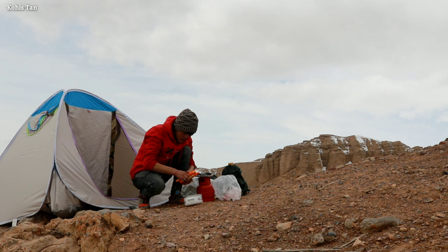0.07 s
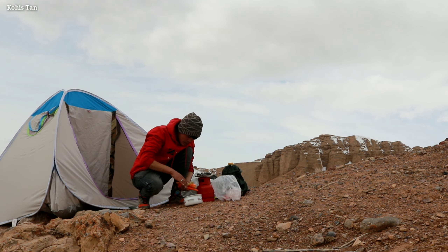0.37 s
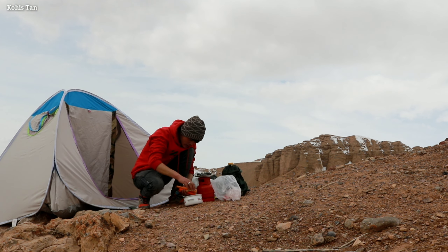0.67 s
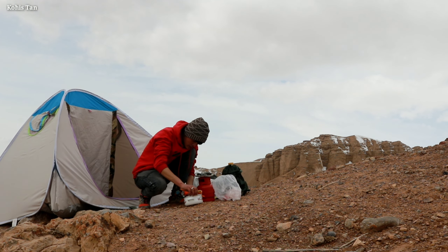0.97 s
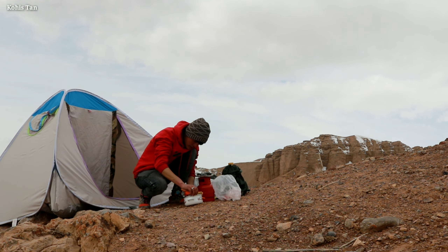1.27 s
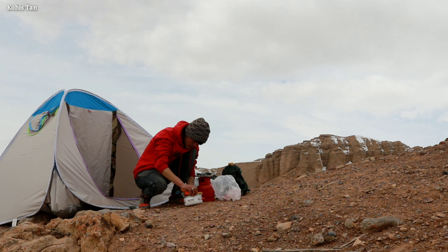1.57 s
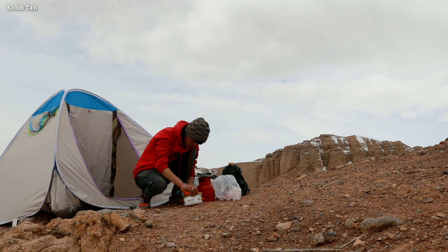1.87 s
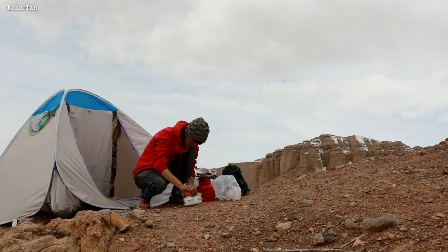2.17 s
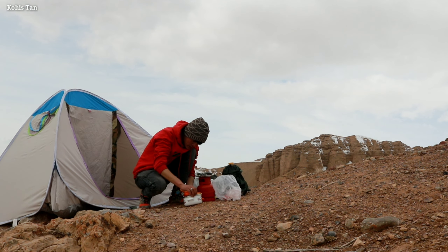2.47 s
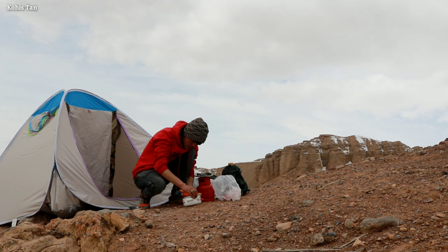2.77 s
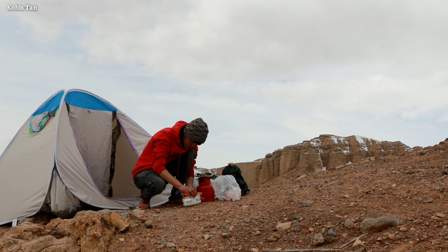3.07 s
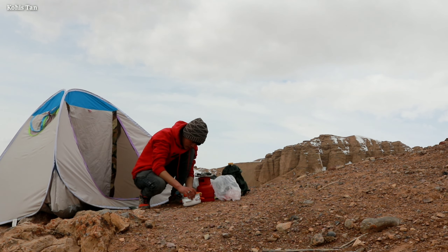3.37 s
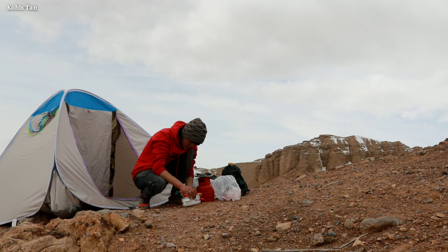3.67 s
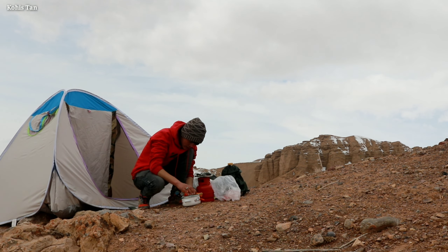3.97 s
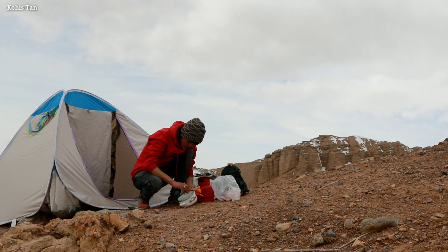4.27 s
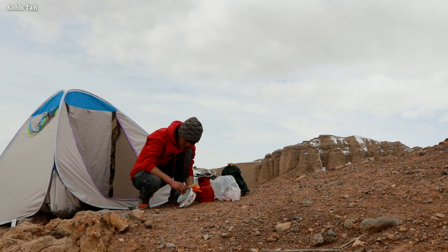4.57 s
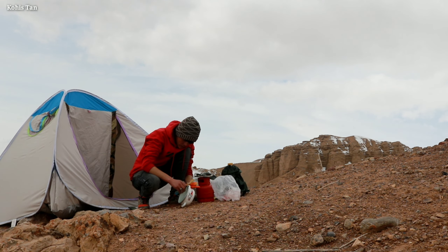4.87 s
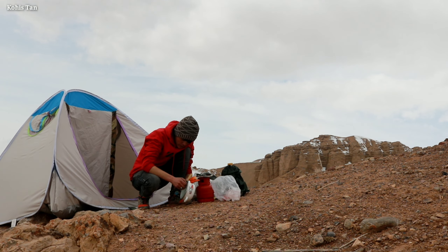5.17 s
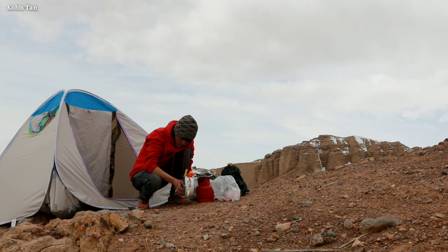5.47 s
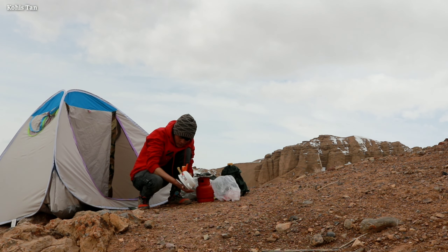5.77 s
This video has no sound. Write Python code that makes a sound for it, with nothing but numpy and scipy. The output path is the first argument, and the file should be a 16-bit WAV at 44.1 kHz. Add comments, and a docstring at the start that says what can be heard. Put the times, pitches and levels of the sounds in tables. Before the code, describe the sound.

Someone handles a metal camp pot a few metres ahead in open desert with no echo. It gives scattered, hand-muffled knocks and taps, then sharper clanks as the wire handle rattles and faintly rubs. Near the end the lid comes off with a quick clatter and a hollow ring. Low wind buffets the microphone throughout, mostly on the right, over a faint steady hiss.

```python
"""A camp pot in the wind

Someone by a tent handles a metal pot a few metres away, in open desert with no echo. Muffled by the
hand, the pot knocks and chatters; its wire handle rattles and rubs, and the lid comes off with a
hollow ring. Wind buffets the microphone, mostly on the right, over a faint steady hiss."""
import sys
import numpy as np
from scipy import signal
from scipy.fft import rfft, irfft, next_fast_len
from scipy.io import wavfile
from scipy.ndimage import uniform_filter1d

SR = 44100
rng = np.random.default_rng(int(sys.argv[2]) if len(sys.argv) > 2 else 0)


def to_wav(sig):
    """Store sig (one row per channel, or 1-D mono) as 16-bit WAV at the path in sys.argv[1].

    Samples outside -1..1 are clipped; the rate is SR.
    """
    pcm = np.clip(np.atleast_2d(sig), -1, 1) * 32767
    pcm = np.round(pcm).astype(np.int16)
    wavfile.write(sys.argv[1], SR, pcm.T)  # frames by channels


N = 265658
T = np.arange(N) / SR
AGE = np.arange(SR // 2) / SR  # seconds since a blow


def pot():
    """Each knock is a clack, short notes of the gripped wall, a freer ring and a thud on the ground."""
    # Each row: start in seconds, level in dB, treble change in dB, thud against the knock in dB,
    # three wall notes in Hz, free ring against those notes in dB.
    knocks = [(0.9501, -39, -0.5, -11, 1310, 1550, 2275, 3), (1.007, -59.5, -18, -5, 1571, 990, 2277, -3),
              (1.0497, -47, -6, -6.5, 1314, 1580, 2240, -2), (1.4626, -53.5, -9, -19, 1125, 1450, 2360, -3),
              (1.5821, -47.5, -4.5, -8.5, 1090, 1440, 2390, 1), (1.8103, -52, -9, -21, 1110, 1580, 2740, 1),
              (2.4305, -47.5, -3.5, -14, 1106, 1644, 2310, -4),
              (2.753, -35.5, -2, -14, 1576, 2300, 2667, 0), (2.914, -58.5, -17, -4.5, 1620, 1080, 2880, -9),
              (3.0203, -51, -6, -6, 1870, 1070, 2310, -4), (3.1938, -43.5, -9, -9, 1473, 930, 2230, 2.5),
              (3.5259, -42, -1, -7, 1690, 1150, 2700, -2),
              (3.81, -30.5, -0.5, -10.5, 1764, 1325, 2710, -3.5),
              (3.867, -55.5, -10, 4, 1060, 1720, 1960, -3), (3.971, -54, -13, 7.5, 1480, 1140, 1545, 1),
              (4.301, -49.5, -15, -7.5, 1290, 830, 1600, 1), (5.021, -58, -22, -9, 1080, 1310, 2100, -14),
              (5.5443, -51, -7, 0, 1850, 1060, 2230, -16), (5.5862, -50.5, -10, -8, 1336, 1130, 2670, -16),
              (5.67, -47, -3.5, -12, 1390, 1160, 2280, -12), (5.7101, -53, -2, -6, 1290, 1049, 2710, -9),
              (5.7253, -48.5, -5.5, -12, 1240, 1480, 2680, -5),
              (5.7455, -41.5, 2.5, -17, 1420, 2280, 2645, -18)]
    # The tone of chattering metal. Each row: frequency in Hz, gain in dB.
    clack_tone = [(90, -10), (195, -4.5), (280, -1.5), (480, 1.5), (850, -3.5), (1300, -3), (1620, -10),
                  (1950, -10), (2300, -6), (2650, -3.5), (3250, -12.5), (3950, -12), (4500, -14.5),
                  (8000, -17.5), (15000, -31.5)]
    # How the wall rings. Each row: pitch in Hz, strength in dB, fade time in seconds.
    wall_modes = [(1067, -15, 0.14), (1317, -13, 0.18), (1540, 9.5, 0.051), (1623, 0, 0.063),
                  (1807, -7.5, 0.058), (2136, -5, 0.089), (2303, 8, 0.069), (2757, -2.5, 0.076),
                  (2980, -10, 0.15), (3805, 11, 0.069), (4020, 0, 0.1), (4740, -11, 0.071),
                  (5170, -4, 0.068), (5360, -9, 0.15), (6050, -12, 0.082)]
    # The pot bumping the ground. Each row: pitch in Hz, strength in dB, fade time in seconds.
    thud_modes = [(208, -1.5, 0.058), (274, -5.5, 0.042), (373, -5.5, 0.037)]
    out = np.zeros(N)
    for start, db, treble_db, thud_db, main_hz, second_hz, high_hz, free_db in knocks:
        clack = colour(chatter(hold_s=0.0042, t60=0.056, first=4.5), clack_tone)
        clack_db = -1.5 - 0.28 * (db + 41.5)  # light touches clack, hard blows ring
        notes = [(main_hz, 0, .05), (second_hz, -2, .04), (high_hz, 2, .055),
                 (3850, -4, .04), (4060, -8, .04)]
        gripped = attack_level(ring(notes, rise_s=0.0006), 0)
        free = attack_level(ring(wall_modes, rise_s=0.00056), free_db)
        knock = attack_level(clack, clack_db) + gripped + free
        knock = colour(knock, [(1390, 0), (3750, treble_db)])  # soft contacts are dull
        thud = ring(thud_modes, rise_s=.002)
        add(out, start, attack_level(knock, db) + attack_level(thud, db + thud_db))
    return out


def lid():
    """Scraping jolts of the lid ring the pot's base and the air inside; the air's note climbs."""
    # Each row: start in seconds, air note in dB, pot's base note in dB, drag and fade times in seconds.
    jolts = [(5.67, -50, -45.5, .002, 0.3), (5.712, -39, -47, 0.0044, 0.065),
             (5.728, -52, -35.5, 0.01, 0.13), (5.743, -30.5, -49, 0.0086, .034),
             (5.779, -52, -32, 0.0019, 0.3)]
    # The note of the air in the pot as the gap opens. Each row: time in seconds, pitch in Hz.
    air_pitch = [(5.675, 433.3), (5.71, 469), (5.728, 496), (5.75, 536), (5.78, 572)]
    base_hz, air_roughness, base_roughness = 649, 0.47, 0.066
    air, base = np.zeros((2, N), complex)
    for start, air_db, base_db, drag_s, t60 in jolts:
        grit = (wander(317) + 1j * wander(310))[:len(AGE)]  # shakes both loudness and phase
        swell = fade(t60, drag_s) * rise(0.0013)
        add(air, start, undb(air_db) * swell * (1 + air_roughness * grit))
        add(base, start, undb(base_db) * swell * (1 + base_roughness * grit))
    air_cycles = np.cumsum(np.interp(T, *np.transpose(air_pitch))) / SR
    return np.imag(air * np.exp(2j * np.pi * air_cycles) + base * np.exp(2j * np.pi * base_hz * T))


def handle_clinks():
    """The wire handle skids in its hinges: a gritty scrape, a tick, a short note and a thin ring."""
    # Each row: start in seconds, body strength in dB, note in Hz, tick level in dB.
    clinks = [(2.8833, -51, 1545, -64), (2.8968, -54, 1520, -64), (2.9605, -48, 1850, -60),
              (2.9696, -48, 3250, -57.5), (2.9808, -51, 4150, -61), (2.9943, -49, 1820, -56.5),
              (3.0321, -43, 1870, -59.5), (3.0657, -44, 1887, -61), (4.0709, -56, 1846, -72),
              (4.174, -54, 2320, -67), (4.2098, -72, 2920, -61), (4.2285, -71, 3950, -63),
              (4.3236, -57, 3150, -60), (4.387, -80, 2900, -57), (4.409, -55, 1980, -70),
              (5.7471, -51, 3530, -61), (5.7564, -48, 3600, -69), (5.777, -54, 2300, -60)]
    # How the wire rings. Each row: pitch in Hz, strength in dB, fade time in seconds.
    wire_modes = [(1152, -2, 0.11), (1895, -0.5, 0.14), (2310, -4, 0.057), (2760, 1, 0.11),
                  (3340, 8, 0.031), (3880, 1, 0.045), (4240, -22, 0.041), (4940, 1, 0.06), (6300, -10, .06),
                  (7800, -17, 0.15)]
    scrape_tone = [(200, 20), (900, -6), (1900, 6), (4000, -14), (5300, -5), (7000, -4.5), (15000, -62)]
    out = np.zeros(N)
    for start, body_db, hz, tick_db in clinks:
        skid = chatter(hold_s=0.0011, t60=0.06, first=2) * rise(0.0014)
        scrape = colour(skid, scrape_tone)
        tick = colour(skid, [(2500, -1.5), (6000, -6), (8500, -4), (15000, -18)])
        note = ring([(hz, 0, .05)], rise_s=0.0023)
        wire = ring(wire_modes, rise_s=0.0016)
        body = attack_level(wire, -12) + attack_level(note, -11.5) + attack_level(scrape, -12.5)
        add(out, start, undb(body_db) * body + attack_level(tick, tick_db))
    return out


def loose_ring():
    """When the fingers let go, the wall rings on; whatever still touches it takes treble away."""
    # The grip loosens. Each row: start in seconds, level in dB, change above 2000 Hz in dB.
    releases = [(3.528, -55, -21), (3.817, -47.5, -6), (4.307, -54.5, -12), (5.589, -53, -16),
                (5.680, -56, -1), (5.754, -43.5, 5.5)]
    # The pot hanging loose. Each row: pitch in Hz, strength in dB, fade time in seconds.
    loose_modes = [(1151, 1, 0.22), (1280, -2.5, 0.14), (1505, -2, 0.15), (2250, 3, 0.065),
                   (3500, 3, 0.066), (3832, -0.5, 0.14), (3820, -20, 0.14), (5160, -9, 0.08),
                   (6300, -2, 0.076)]
    out = np.zeros(N)
    for start, db, treble_db in releases:
        modes = [(hz, mode_db + treble_db * (hz > 2000), t60) for hz, mode_db, t60 in loose_modes]
        add(out, start, attack_level(ring(modes, rise_s=0.0039), db))
    return out


def handle_rub():
    """As the pot is lifted, the wire sticks and slips on the rim and keeps a few thin notes singing."""
    # The course of the rub. Each row: time in seconds, level in dB.
    rub_levels = [(4.03, -99), (4.09, -62), (4.14, -67), (4.20, -62), (4.27, -70), (4.33, -57),
                  (4.42, -64.5), (4.48, -68), (4.56, -85)]
    # The notes it sings. Each row: pitch in Hz, width in Hz, gain in dB.
    rub_notes = [(1300, 22, -7), (1840, 7.2, 5), (2320, 39, -20), (2840, 8.8, 5), (3280, 26, -7),
                 (3900, 42, -8), (5150, 120, -14), (6230, 180, -16), (8450, 1700, -18)]
    friction = rng.standard_normal(N) * undb(3.5 * wander(150))
    song = sum(undb(db) * signal.lfilter(*signal.iirpeak(hz, hz / width, fs=SR), friction)
               for hz, width, db in rub_notes)
    times, levels_db = np.transpose(rub_levels)
    return unit(song) * np.interp(T, times, undb(levels_db), left=0, right=0)


def buffets():
    """A swirl of air hits the microphone: one swing of pressure with a ragged wake behind it."""
    # Each row: start in seconds, strength in dB, pitch in Hz, left minus right in dB.
    swirls = [(0.269, -49, 130, -18), (0.479, -52, 210, -25), (0.83, -48, 73, -27),
              (1.373, -45.5, 109, -25), (1.399, -42, 110, -11), (1.485, -40, 85, -28),
              (1.645, -42, 133, -29), (1.735, -49.5, 212, -22), (1.779, -45, 66, -10),
              (1.826, -42.5, 100, -25), (1.933, -45, 162, -36), (2.047, -46, 171, -24),
              (2.991, -47, 75, -19), (3.234, -41.5, 62.4, -18), (5.113, -48, 130, -21),
              (5.999, -37, 136, -20)]
    out = np.zeros((2, N))
    for start, db, hz, pan_db in swirls:
        cycles = hz * AGE
        swing = np.sin(2 * np.pi * cycles) * cycles * np.exp(-cycles ** 2)
        wake_tone = [(hz / 4, -14), (hz, 0), (2 * hz, -3), (4 * hz, -17), (9 * hz, -55)]
        wake = colour(rng.standard_normal(len(AGE)), wake_tone) * AGE * np.exp(-AGE / 0.012)
        wake = colour(wake, [(280, 4), (420, -1.5), (700, -36.5), (2000, -51)])
        puff = attack_level(swing, 0) + attack_level(wake, -1.3)
        sides = undb(np.array([[pan_db], [-pan_db]]) / 2)
        add(out, start, sides / sides.mean() * undb(db) * puff)
    return out


def wind():
    """Churning air rumbles on each side of the microphone and surges a few times a second."""
    # The strength of the wind. Each row: time in seconds, left in dB, right in dB.
    gusts = [(0.0, -52, -42.5), (0.6, -53.5, -49), (0.9, -51.5, -43.5), (1.2, -59, -55), (1.38, -54, -43.5),
             (1.68, -61, -41.5), (1.76, -45, -40.5), (1.95, -53, -43.5), (2.28, -57, -47), (2.46, -48, -57),
             (2.58, -61.5, -49), (2.82, -59, -57), (3.24, -52.5, -43), (3.48, -62, -49.5),
             (3.78, -46.5, -49.5), (3.9, -60, -51.5), (4.56, -52, -46.5), (4.76, -52, -56),
             (4.92, -56, -48), (5.38, -51.5, -47.5), (5.88, -54.5, -55), (6.01, -60, -39)]
    # The tone of the deep rumble. Each row: frequency in Hz, gain in dB.
    rumble_tone = [(12, -34), (25, -8), (50, -1), (90, -3), (150, -12.5), (250, -26.5), (400, -31),
                   (2000, -73)]
    # The tone of the higher flutter. Each row: frequency in Hz, gain in dB.
    flutter_tone = [(50, -43), (130, 4), (200, 0.5), (300, -3.5), (430, -12.5), (700, -32.5), (2000, -95.5)]
    times, *sides = np.transpose(gusts)
    surge_db = 1.2 * wander(7)
    out = []
    for side_db in sides:
        gust_db = np.interp(T, times, side_db) + surge_db
        rumble, flutter = noise(rumble_tone), noise(flutter_tone)
        flutter_db = -8.5 + 0.58 * (gust_db + 41.5)  # stronger gusts flutter more
        rumble *= undb(2 * wander(21.9))
        flutter *= undb(flutter_db + 2.2 * wander(35))
        out.append(undb(gust_db) * (rumble + flutter))
    return np.array(out)


def hiss():
    """A faint steady hiss, made separately for left and right."""
    # The tone of the hiss. Each row: frequency in Hz, gain in dB.
    hiss_tone = [(120, -34.5), (200, -3), (659, -5), (896, -7.5), (9210, -18), (13500, -21), (15000, -27)]
    return np.array([noise(hiss_tone), noise(hiss_tone)]) * undb(-56.5)


def ring(modes, rise_s):
    """A struck object sounds its own notes (modes); each point of impact mixes them differently."""
    scatter_db = 2.5
    out = np.zeros(len(AGE))
    for hz, db, t60 in modes:
        gain = undb(db + scatter_db * rng.standard_normal())
        out += gain * fade(t60) * np.sin(2 * np.pi * (hz * AGE + rng.random()))
    return out * rise(rise_s)


def chatter(hold_s, t60, first):
    """The force of loose metal on metal: a first blow, then many tiny bounces that die away."""
    force = rng.standard_normal(len(AGE)) * fade(t60, hold_s)
    force[0] += first
    return force


def rise(rise_s):
    """Build up smoothly from 0 towards 1."""
    return 1 - np.exp(-AGE / rise_s)


def fade(t60, hold_s=0):
    """Hold for a moment, then fall by 60 dB every t60 seconds (the fade time)."""
    return np.exp(-np.log(1000) * np.maximum(AGE - hold_s, 0) / t60)


def wander(rate):
    """A smooth random drift of about size 1, with `rate` new values a second."""
    span = int(SR / rate)
    steps = np.repeat(rng.standard_normal(N // span + 1), span)
    return unit(uniform_filter1d(uniform_filter1d(steps, span), span)[:N])


def noise(tone):
    """Steady noise of size 1 with the given tone."""
    return unit(colour(rng.standard_normal(N), tone))


def colour(x, points):
    """Shape the tone of a sound along a curve of (Hz, dB) points."""
    hz, db = np.transpose(points)
    n = 2 * next_fast_len(x.shape[-1])
    log_hz = np.log(np.arange(n // 2 + 1) * SR / n + 1)
    log_gain = np.log(undb(np.interp(log_hz, np.log(hz), db)))
    # Fold the filter forward in time, so nothing sounds before its cause.
    cepstrum = irfft(log_gain) * (1 + np.sign(n // 2 - np.arange(n)))
    cepstrum[0] /= 2
    return irfft(rfft(x, n) * np.exp(rfft(cepstrum)))[..., :x.shape[-1]]


def undb(db):
    """Turn decibels into a gain."""
    return 10 ** (np.asarray(db) / 20)


def unit(x):
    """Scale to an average (rms) size of 1."""
    return x / np.sqrt(np.mean(x ** 2))


def attack_level(x, db):
    """Scale a blow so that its first 30 ms have this average (rms) level."""
    head = x[:int(.03 * SR)]
    return x * undb(db) / np.sqrt(np.mean(head ** 2))


def add(track, start, sound):
    """Mix a sound into a track at a start time in seconds."""
    i = int(start * SR)
    track[..., i:i + sound.shape[-1]] += sound[..., :N - i]


def scene():
    """The pot is almost straight ahead, a touch to the right, with wind and hiss around it."""
    metal = pot() + handle_clinks() + handle_rub() + lid() + loose_ring()
    delayed = np.roll(metal, 1)  # reaches the left side one sample later
    left = colour(delayed, [(500, 0), (1200, -.8), (2500, -1.3), (6000, -.5)])
    right = colour(metal, [(500, 0), (1200, .8), (2500, 1.1), (6000, .5)])
    return np.array([left, right]) + wind() + buffets() + hiss()


def record(dry):
    """Cut away the very highest treble."""
    top_hz = 15500
    return signal.sosfilt(signal.ellip(8, .2, 70, top_hz, fs=SR, output="sos"), dry)


dry = scene()
out = record(dry)
to_wav(out)
```